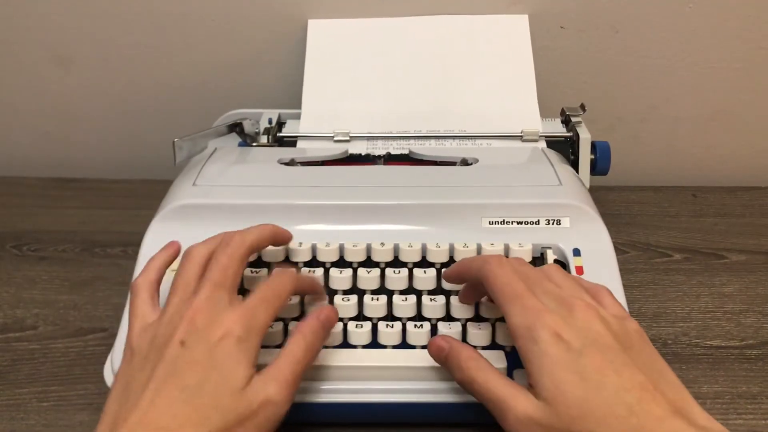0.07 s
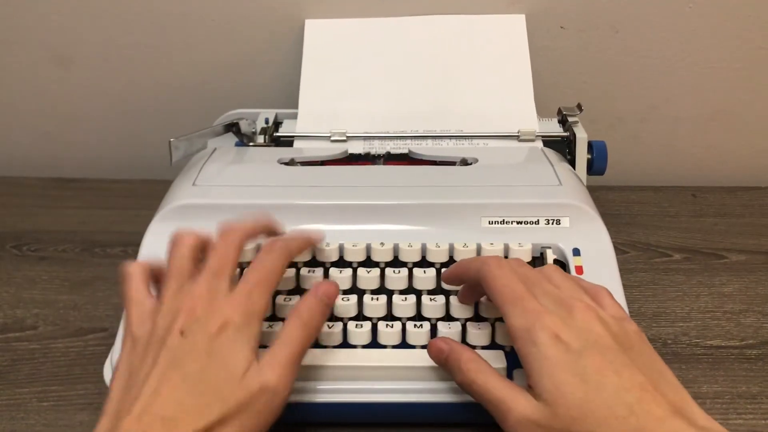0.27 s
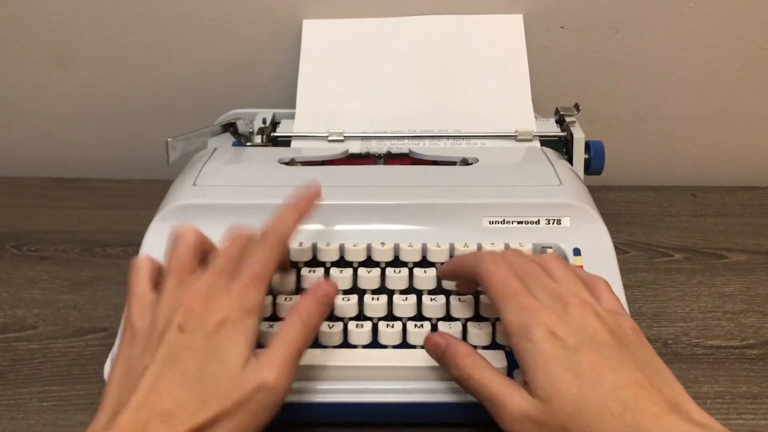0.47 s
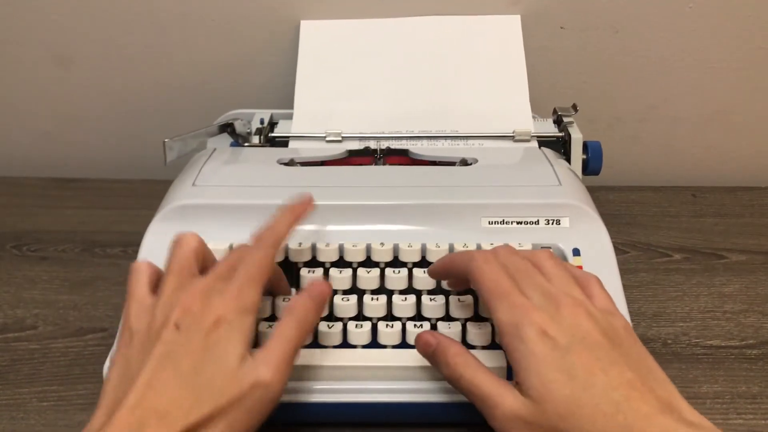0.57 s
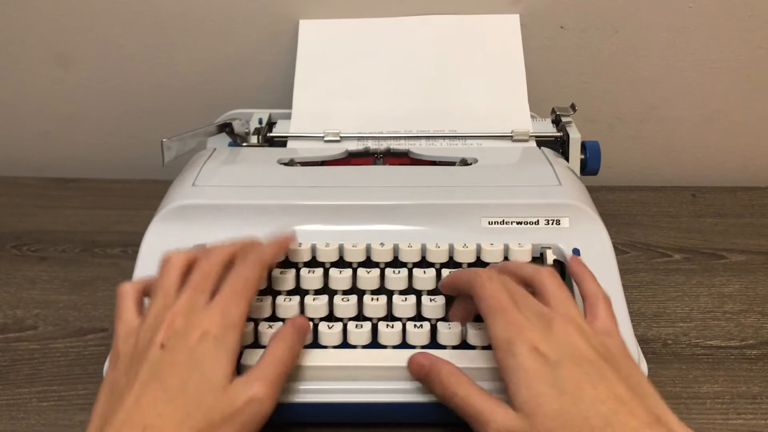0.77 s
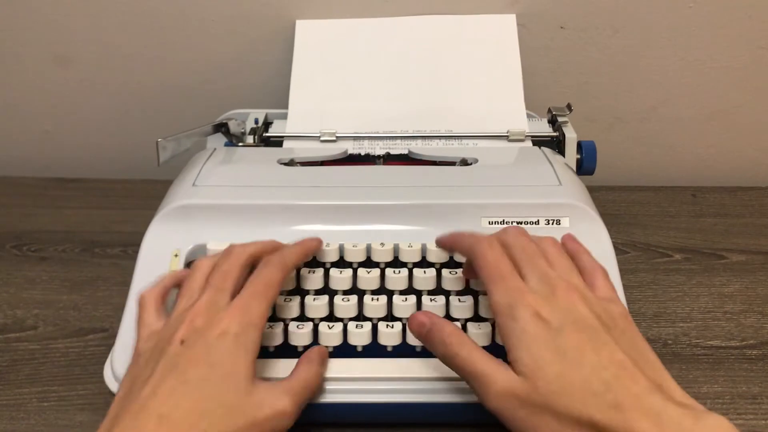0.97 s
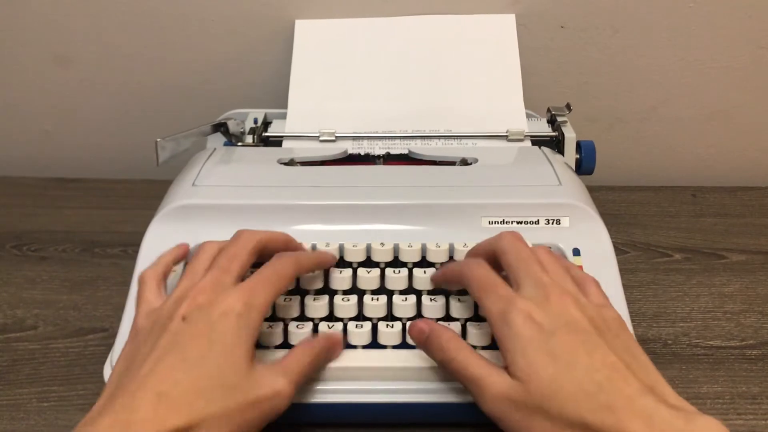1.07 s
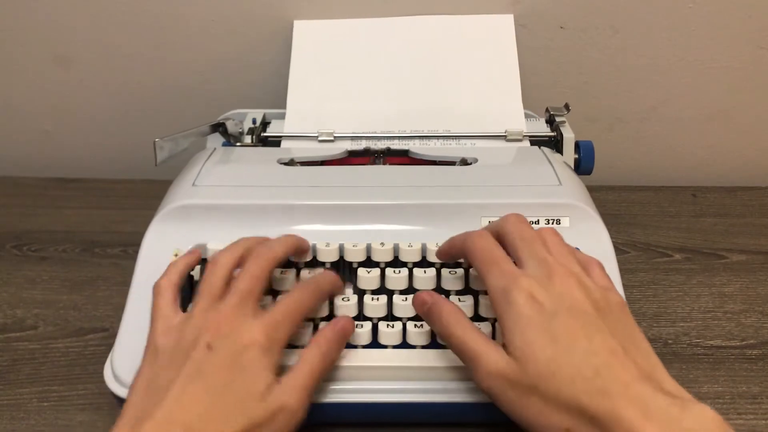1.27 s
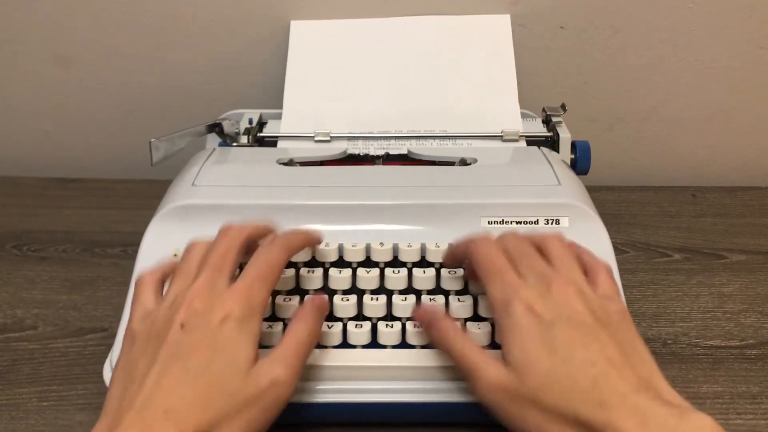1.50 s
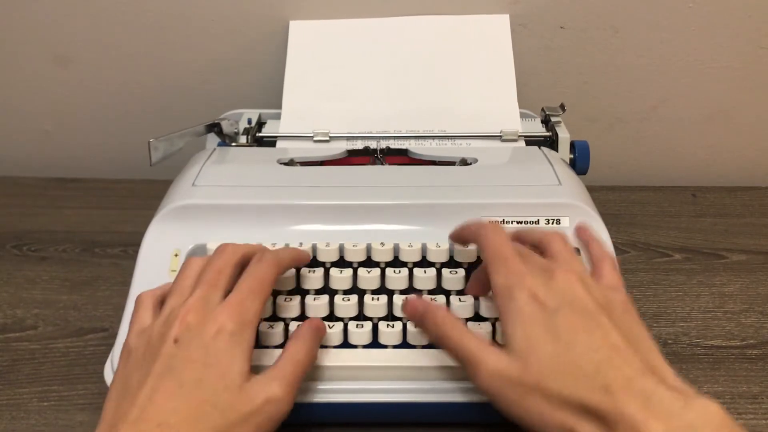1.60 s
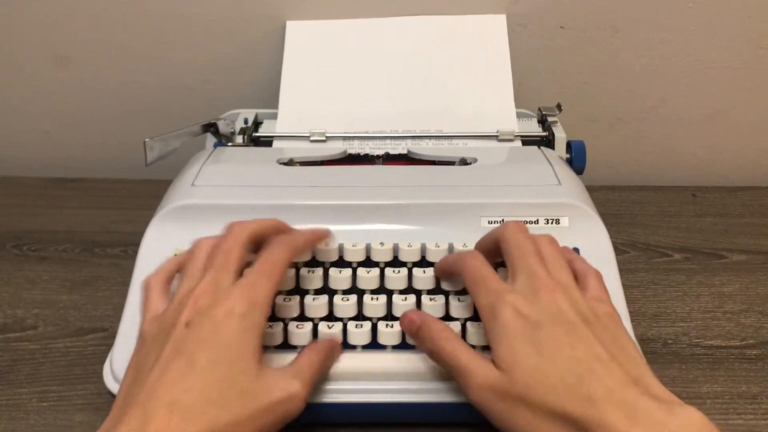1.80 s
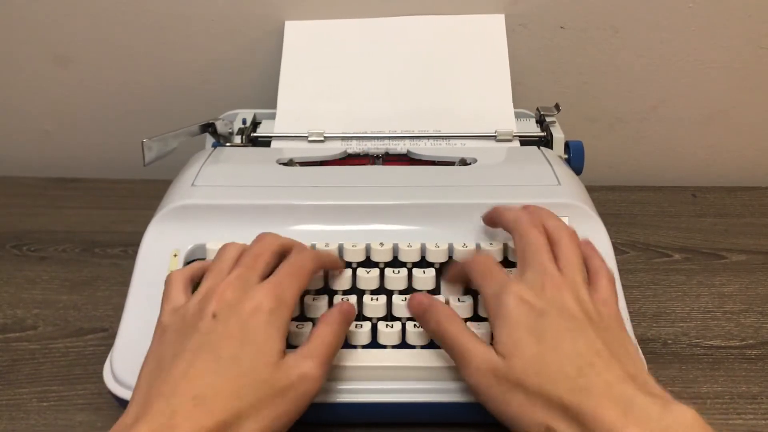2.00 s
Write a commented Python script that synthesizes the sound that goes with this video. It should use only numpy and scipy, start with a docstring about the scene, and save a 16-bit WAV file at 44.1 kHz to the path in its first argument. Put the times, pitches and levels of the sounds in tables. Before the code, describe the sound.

A manual typewriter is typed on slowly, close by. Sharp metallic clacks land at about 0.2, 0.4, 0.6 and 0.9 seconds, followed by a softer space bar rattle at 1.0. Two more clacks come at 1.4 and 1.6 seconds, and another space at 1.8. Between strokes, levers tick, springs ring and the case thumps softly on the table. The small room hums faintly.

```python
"""Slow typing on a manual typewriter

Six letters and two spaces are typed on a portable typewriter on a wooden table. Each type bar
swishes up, slaps the platen (the paper roller) and trips the escapement (the catch that lets the
carriage step along), ringing the steel frame. Between letters, levers tick, bars rattle back,
springs ring and the case thumps. A small, faintly humming room answers."""
import sys
import numpy as np
from scipy import signal
from scipy.fft import rfft, irfft, next_fast_len
from scipy.io import wavfile
from scipy.ndimage import uniform_filter1d, map_coordinates

SR = 44100
rng = np.random.default_rng(int(sys.argv[2]) if len(sys.argv) > 2 else 0)


def inscribe(sig):
    """Save sig as 16-bit PCM at rate SR to the path in sys.argv[1].

    A 1-D sig is mono; a 2-D sig holds one channel per row.
    Samples are clipped to [-1, 1] before scaling.
    """
    pcm = np.round(np.clip(np.atleast_2d(sig).T, -1, 1) * 32767)
    wavfile.write(sys.argv[1], SR, pcm.astype(np.int16))


N = 90404
T = np.arange(SR // 3) / SR  # time within one short sound [s]

# ringing notes of springs and key levers (pitch [Hz], level [dB], t60: time to fade by 60 dB [s])
SPRINGS = [(885, -17, .16), (970, -19, .2), (1065, -21, .15), (1190, -24, .13), (1842, -21, .1),
           (3250, -21, .07)]
# tone colour of small metal parts knocking together (frequency [Hz], level [dB])
CLATTER = [(100, 3.5), (350, -5.5), (620, -8.5), (1000, 3.5), (1450, -3), (1900, -1.5), (3300, -5.5),
           (5000, -5), (7500, -9), (10500, -11), (14000, -11), (16000, -14)]


def type_bars(swish_s=0.022, rebound_s=0.0087):
    """Each bar swishes up, slaps the roller, rings the frame and springs, and bounces once."""
    # bars hitting the roller (time [s], level [dB], treble [dB])
    strikes = [(0.2229, -11, -2.5), (0.4225, -10.5, -1), (0.6079, -11.5, -2), (0.8678, -13, 2.5),
               (1.37, -11.5, 1), (1.6317, -13, 2.5)]
    # contacts in one strike: slap, chatter, catches, settling (delay [s], level [dB], t60 [s])
    contacts = [(0, 1, 0.0087), (.001, -3, 0.021), (.0066, -11, 0.013), (.0086, -2, 0.0081),
                (.0098, -16.5, .03), (0.015, -24, 0.027)]
    # tone colour of the slap (frequency [Hz], level [dB])
    slap_tone = [(100, -8.5), (350, -24.5), (640, -13), (950, 0.5), (1400, -6.5), (1800, 2), (2100, -1.5),
                 (2750, -4), (3550, 1.5), (4000, -3.5), (5400, -1), (6600, -1), (7400, -6.5), (8400, -4.5),
                 (10300, -9), (12500, -3), (13200, -6), (14200, -1.5), (15500, -3.5), (16000, -4)]
    # ringing notes of the steel frame and the basket of bars (pitch [Hz], level [dB], t60 [s])
    frame_notes = [(880, -21, 0.053), (1010, -20, 0.05), (1800, -11.5, 0.042), (1925, -16, .055),
                   (2778, -14, 0.065), (3092, -15.5, 0.06), (3440, -13, .045), (3665, -12, .05),
                   (4445, -15, 0.055), (4861, -16, .055), (5350, -9.5, 0.055), (5484, -15, .05),
                   (5923, -16, .05), (6171, -14, 0.055), (6397, -15, .05), (8086, -15.5, .05)]
    out, power = np.zeros(N), np.zeros(len(T))
    for delay, contact_db, t60 in contacts:
        add(power, delay, (amp(contact_db) * fade(t60)) ** 2)
    swish_rise = amp(24 * np.minimum(T / swish_s - 1, 0)) * (T < swish_s)
    for s, db, treble_db in strikes:
        slap = colour(even_noise(np.sqrt(power)), slap_tone, treble_db)
        hit = slap + amp(-2) * ring(frame_notes, scatter_db=1)
        add(hit, rebound_s, amp(-7.5) * slap * fade(t60=0.08))
        springs = amp(-9) * ring(SPRINGS, scatter_db=-1.0)
        echo = amp(-8.5) * room(hit, build_s=0.0031, wall_db=-1.5, wall_t60=0.65)
        add(out, s, amp(db) * (hit + springs + echo))
        swish = colour(rng.standard_normal(len(T)) * swish_rise, CLATTER, treble_db=8)
        add(out, s - swish_s, amp(db - 24.5) * swish)
    return out


def levers():
    """Levers and catches tick, and the keys rattle as they come back up."""
    # single ticks (time [s], level [dB], treble [dB])
    ticks = [(0.06, -54, 1), (.175, -45, 12.5), (0.289, -42, 9.5), (.368, -28.5, -3), (.492, -48.5, 16),
             (0.569, -28, 1), (.758, -32.5, 1), (0.832, -57.5, 29.5), (.967, -37.5, -3), (1.067, -38, 4),
             (1.153, -39, -3), (1.164, -36.5, 0.5), (1.185, -38.5, 5.5), (1.323, -51.5, 16.5),
             (1.547, -29, 4.5), (1.553, -40.5, 11), (1.583, -47.5, 14.5), (1.753, -43, 6), (1.893, -43, 3),
             (1.913, -38.5, -5), (1.931, -40.5, 7)]
    # rattles of key links and returning bars (time [s], length [s], level [dB], treble [dB])
    rattles = [(.001, 0.0047, -43.5, -10), (0.167, 0.023, -60.5, 9), (0.32, 0.027, -41.5, 0.5),
               (0.385, 0.0042, -45, 14.5), (0.525, 0.02, -42.5, 3.5), (0.578, 0.083, -52, 7),
               (0.708, 0.031, -43, 2), (0.828, 0.014, -44.5, 1.5), (0.97, 0.019, -41, 1.5),
               (1.068, 0.013, -41, -3), (1.17, 0.021, -43, -1), (1.318, 0.031, -55, 6.5),
               (1.475, 0.006, -50.5, 9), (1.508, 0.02, -40.5, 0), (1.548, 0.0094, -45.5, -11),
               (1.8, 0.058, -47.5, -9), (1.915, 0.023, -43, -1)]
    out = np.zeros(N)
    for s, db, treble_db in ticks:
        tick = even_noise(fade(t60=0.022))
        add(out, s, amp(db) * linkage(tick, treble_db, SPRINGS, ring_db=-4.5))
    for s, length, db, treble_db in rattles:
        add(out, s, amp(db) * linkage(rattle(length), treble_db, SPRINGS, ring_db=-4.5))
    return out


def space_bar():
    """The carriage rattles one step along, with hard clacks that ring its toothed rail, the rack."""
    # carriage steps (time [s], length [s], level [dB], treble [dB])
    steps = [(1.017, 0.027, -40, 4.5), (1.762, 0.033, -39.5, 4.5)]
    # clacks of the space bar, its catch and the carriage stop (time [s], level [dB], treble [dB])
    clacks = [(1.0173, -31, -1), (1.029, -28, -1), (1.045, -28.5, -4), (1.762, -30.5, 1),
              (1.7791, -30.5, -2), (1.8, -43, -8), (1.811, -31, 1.5)]
    # ringing notes of the space bar and rack (pitch [Hz], level [dB], t60 [s])
    rack_notes = [(976, -20.5, .12), (1182, -14.5, 0.1), (1810, -20, 0.08), (2190, -14, 0.049),
                  (2545, -16, 0.05), (2810, -18, .04), (4300, -11.5, 0.028), (4490, -11.5, 0.033),
                  (6500, -19.5, 0.041)]
    out = np.zeros(N)
    for s, length, db, treble_db in steps:
        add(out, s, amp(db) * linkage(rattle(length), treble_db, rack_notes, ring_db=-2))
    for s, db, treble_db in clacks:
        clack = colour(even_noise(fade(t60=0.022)), CLATTER, treble_db)
        ringing = amp(1.5) * ring(rack_notes, scatter_db=4)
        add(out, s, amp(db) * in_room(clack + ringing))
    return out


def returning_bars():
    """A bar clinks on its own note as it falls back into the basket."""
    # bars landing on their rest (time [s], pitch [Hz], level [dB])
    clinks = [(0.727, 1820, -36.5), (.758, 1840, -39.5), (0.984, 1850, -38), (1.162, 2276, -36),
              (1.182, 1840, -40), (1.915, 2252, -39.5), (1.927, 1830, -39.5)]
    # tones within one clink (multiple of the pitch, level [dB], t60 [s])
    bar_tones = [(1, -2.5, 0.1), (.93, -11.5, .04), (1.47, -6, 0.044)]
    out = np.zeros(N)
    for s, hz, db in clinks:
        notes = [(hz * multiple, level, t60) for multiple, level, t60 in bar_tones]
        add(out, s, amp(db) * in_room(ring(notes, scatter_db=0)))
    return out


def case(attack_s=0.0042, pivot_hz=140):
    """Keys hitting bottom and springing back rock the case on the table."""
    # thumps; a lower tilt sounds deeper (time [s], level [dB], tilt [dB per octave])
    thumps = [(.004, -39, 2), (0.225, -38, 2), (0.257, -36, 2), (.335, -37.5, 0), (.425, -35, 1.5),
              (0.459, -39.5, -0.5), (0.611, -40.5, 5.5), (0.643, -34.5, 2.5), (0.724, -37, -2),
              (0.869, -35, 0), (0.905, -36, 1), (0.988, -41.5, 5), (1.058, -32.5, -4), (1.176, -34.5, -3),
              (1.374, -38, 3.5), (1.409, -36.5, 1), (1.55, -40, 3), (1.637, -34.5, 1.5),
              (1.794, -33.5, 1.5), (1.916, -41, 2)]
    # low notes of the case and table top (pitch [Hz], level [dB], t60 [s])
    case_notes = [(65.8, -6.5, 0.26), (105, -4.5, 0.18), (142, -4.5, 0.2), (205.3, -13.5, 0.15),
                  (273.6, -10, 0.26), (364.4, -18.5, 0.14), (453, -11.5, 0.12)]
    out = np.zeros(N)
    soft_start = 1 - np.exp(-T / attack_s)
    for s, db, tilt_db in thumps:
        notes = [(hz, level + tilt_db * np.log2(hz / pivot_hz), t60) for hz, level, t60 in case_notes]
        add(out, s, amp(db) * ring(notes, scatter_db=3) * soft_start)
    return out


def linkage(contacts, treble_db, notes, ring_db):
    """Small knocks pass through the levers, set parts ringing and echo in the room."""
    body = ring(notes, scatter_db=5.5)
    ringing = amp(ring_db) * signal.fftconvolve(contacts, body / np.linalg.norm(body))[:len(T)]
    knocks = colour(contacts, CLATTER, treble_db)
    echo = amp(-3) * room(knocks + ringing / 2, build_s=0.0015, wall_db=10, wall_t60=0.44)
    return knocks + ringing + echo


def rattle(length, taps_per_s=490, rise_s=0.0062, fade_s=0.016):
    """Many tiny random taps, dying away after `length` seconds."""
    taps = (rng.random(len(T)) < taps_per_s / SR) * amp(2.5 * rng.standard_normal(len(T)))
    # give every tap a short tail
    power = np.abs(irfft(rfft(taps ** 2) * rfft(fade(t60=0.022) ** 2), len(T)))
    shape = (1 - np.exp(-T / rise_s)) * np.exp(-np.maximum(T - length, 0) / fade_s)
    grains = even_noise(np.sqrt(power) * shape)
    return grains * np.linalg.norm(shape) / (np.linalg.norm(grains) + 1e-9)


def even_noise(envelope, passes=6, size=5400):
    """The harsh noise of metal on metal: even in tone, its loudness following the envelope."""
    x = rng.standard_normal(size) * envelope[:size]
    for _ in range(passes):
        spectrum = rfft(x)
        flattened = irfft(spectrum / (np.abs(spectrum) + 1e-12), size)
        x = np.sign(flattened) * envelope[:size]
    return np.pad(x, (0, len(T) - size))


def ring(notes, scatter_db):
    """A struck part rings with fading pure tones, their levels varied at random by scatter_db."""
    return sum(amp(db + scatter_db * rng.standard_normal()) * fade(t60)
               * np.sin(2 * np.pi * (hz * T + rng.random())) for hz, db, t60 in notes)


def in_room(x):
    """A small metallic sound together with its echo."""
    return x + amp(-5.5) * room(x, build_s=0.0035, wall_db=17, wall_t60=0.13)


def room(x, build_s, wall_db, wall_t60):
    """A blurred echo builds up, dies quickly off the table and wall, then slowly in the room."""
    # how long the room rings (frequency [Hz], t60 [s])
    fade_times = [(150, 0.96), (1000, 0.41), (3500, 0.3), (7000, 0.22), (15000, 0.15)]
    # tone colour of the echo (frequency [Hz], level [dB])
    echo_tone = [(100, -10), (400, 5.5), (600, 5), (980, 6), (1450, -3), (2000, -0.5), (3200, 0.5),
                 (4000, -1), (6000, -0.5), (15000, -0.5)]
    hz, t, bands = signal.stft(x, SR, nperseg=192)
    build = 1 - np.exp(-(t / build_s) ** 2)
    wall_boost = 1 + amp(wall_db) * fade(wall_t60, t)
    tail = (fade(along(fade_times, hz)[:, None], t) * build * wall_boost) ** 2
    tail /= tail.sum(1).mean()
    energy = np.abs(signal.fftconvolve(np.abs(bands) ** 2, tail, axes=1))[:, :len(t)]
    strength = np.sqrt(np.abs(uniform_filter1d(energy, 2, axis=0))) * amp(along(echo_tone, hz))[:, None]
    noise = signal.stft(rng.standard_normal(len(x)), SR, nperseg=192)[2]
    return signal.istft(strength * noise / noise.std(), SR)[1][:len(x)]


def background(hum_hz=253.8, waver_db=1.5, wavers_per_s=7.68):
    """Low room rumble and a faint, wavering hum."""
    # tone colour of the rumble (frequency [Hz], level [dB])
    rumble_tone = [(20, -47.5), (35, 10.5), (60, -1.5), (130, 5), (200, -6), (290, -15), (420, -18),
                   (1000, -26.5), (2000, -32.5), (6000, -38.5), (16000, -50)]
    t = np.arange(N) / SR
    waver = map_coordinates(rng.standard_normal(64), [t * wavers_per_s], mode="mirror")
    hum = amp(waver_db * waver) * np.sin(2 * np.pi * hum_hz * t)
    rumble = colour(rng.standard_normal(N), rumble_tone)
    return amp(-50) * unit(rumble) + amp(-56.5) * unit(hum)


def colour(x, tone, treble_db=0, treble_hz=6800, size=4096):
    """Gives a sound a tone colour, then turns its treble up or down."""
    hz = np.fft.rfftfreq(size, 1 / SR)
    treble_share = 1 - 1 / (1 + (hz / treble_hz) ** 2) ** 2
    gain = unit(amp(along(tone, hz))) * amp(treble_db * treble_share)
    # build the filter so that it rings only after a hit, never before
    cepstrum = irfft(np.log(gain + 1e-6))
    cepstrum[1:size // 2] *= 2
    cepstrum[size // 2 + 1:] = 0
    response = irfft(np.exp(rfft(cepstrum)))
    return signal.fftconvolve(x, response)[:len(x)]


def amp(db):
    """Turns decibels into a volume multiplier."""
    return 10 ** (np.asarray(db) / 20)


def unit(x):
    """Scales a signal to an average (rms) level of 1."""
    return x / np.sqrt(np.mean(x ** 2) + 1e-20)


def along(points, hz):
    """Reads between the rows of a (frequency, value) table on a musical (log) scale."""
    frequencies, values = np.transpose(points)
    return np.interp(np.log(hz + 1), np.log(frequencies + 1), values)


def fade(t60, t=T):
    """A smooth fade that drops 60 dB every t60 seconds."""
    return np.exp(-np.log(1000) * t / t60)


def add(track, s, sound):
    """Mixes a sound into the track at s seconds."""
    start = max(round(s * SR), 0)
    part = sound[:max(len(track) - start, 0)]
    track[start:start + len(part)] += part


def scene():
    """The typewriter in its room, in mono."""
    return (type_bars() + levers() + space_bar() + returning_bars() + case() + background())[None]


def record(dry, peak_db=-4, low_hz=40, top_hz=15900):
    """The microphone rounds off the loudest peaks and loses the deepest bass and highest treble."""
    rounded = dry / (1 + (dry / amp(peak_db)) ** 4) ** 0.25
    size = next_fast_len(N + SR // 2)
    hz = np.fft.rfftfreq(size, 1 / SR)
    bass_cut = (1 - np.exp(-(hz / low_hz) ** 2)) ** 2
    treble_cut = (1 - np.tanh((hz - top_hz) / 200)) / 2
    return irfft(rfft(rounded, size) * bass_cut * treble_cut, size)[..., :N]


dry = scene()
out = record(dry)
inscribe(out)
```